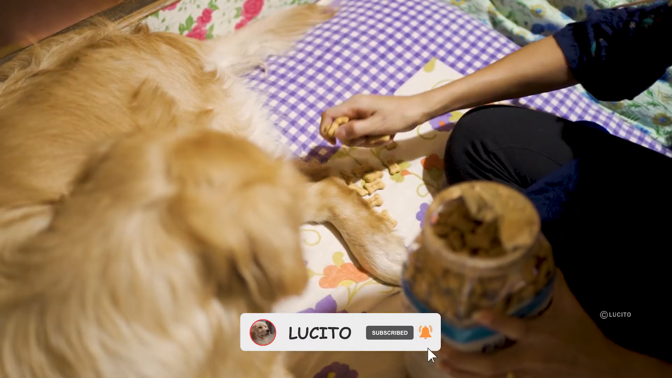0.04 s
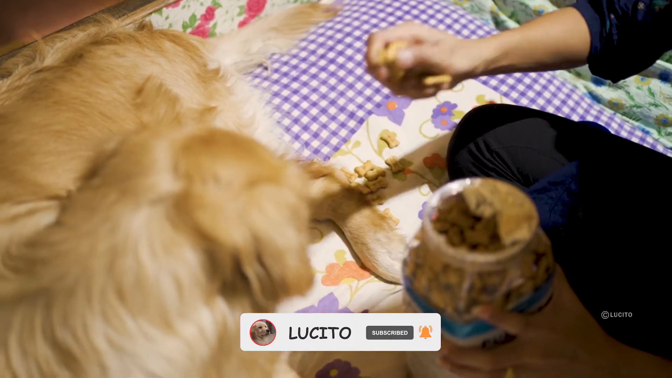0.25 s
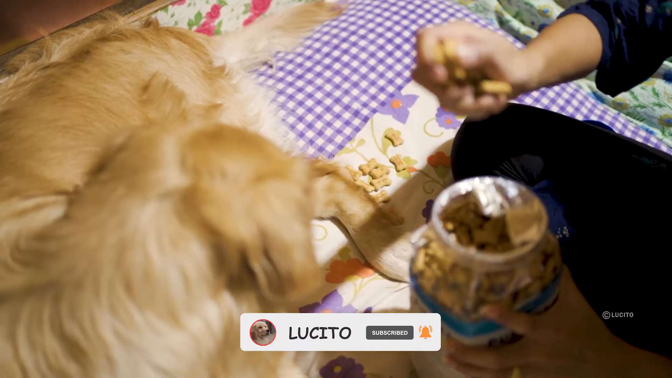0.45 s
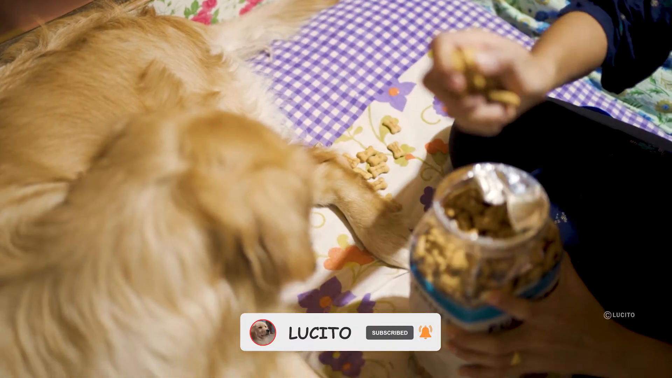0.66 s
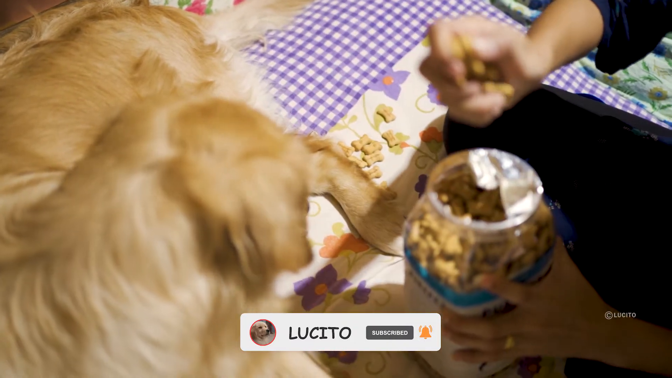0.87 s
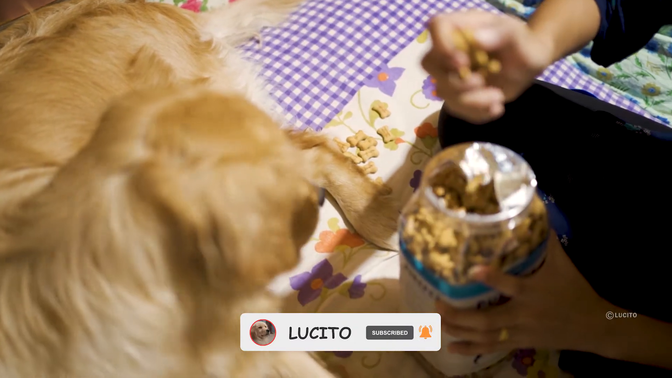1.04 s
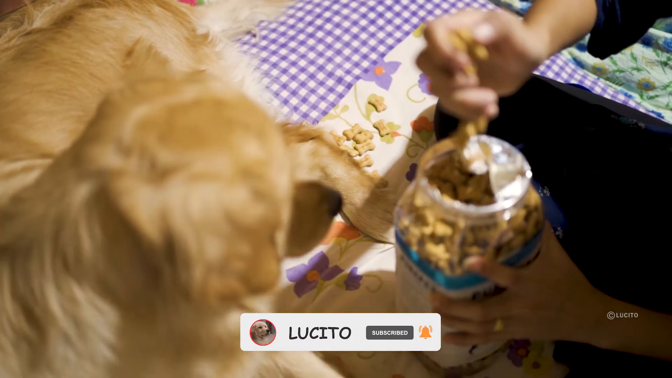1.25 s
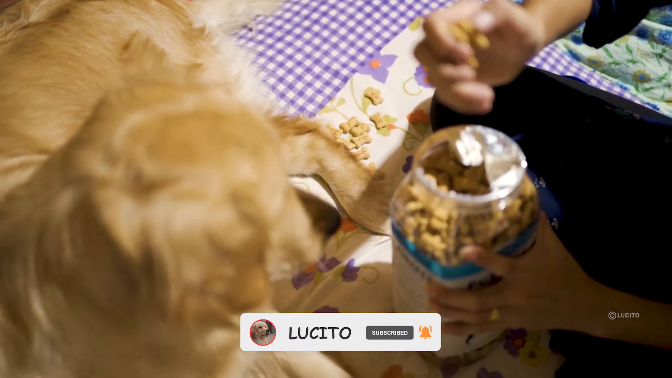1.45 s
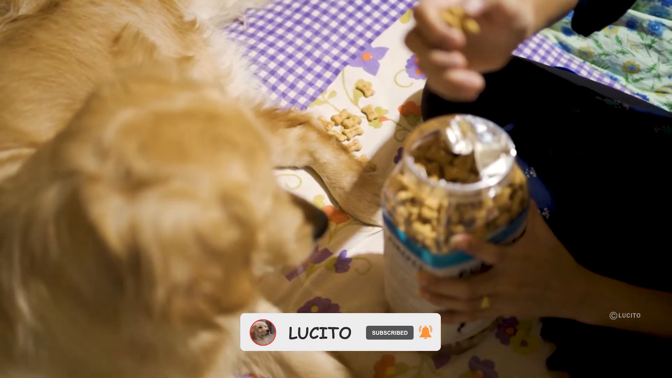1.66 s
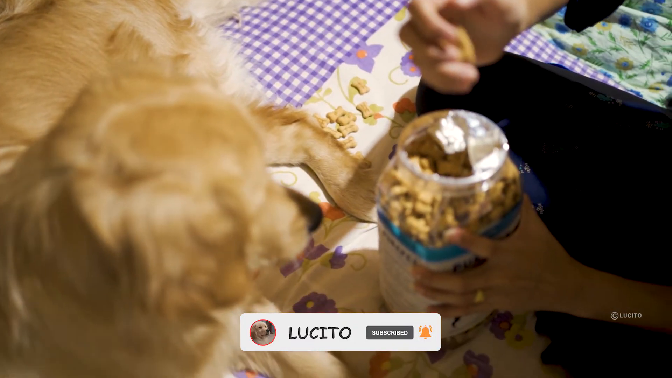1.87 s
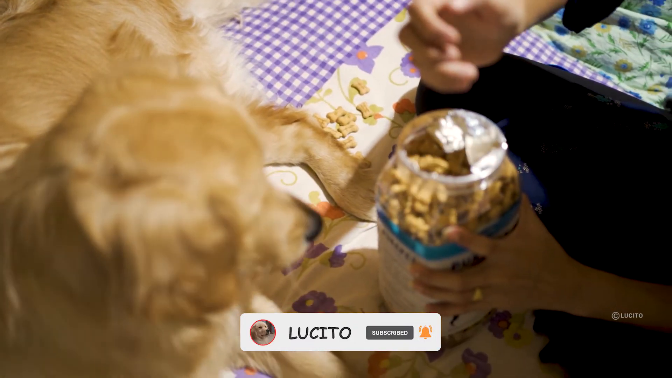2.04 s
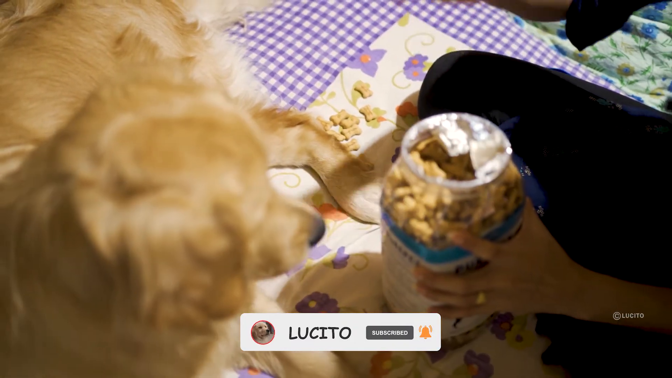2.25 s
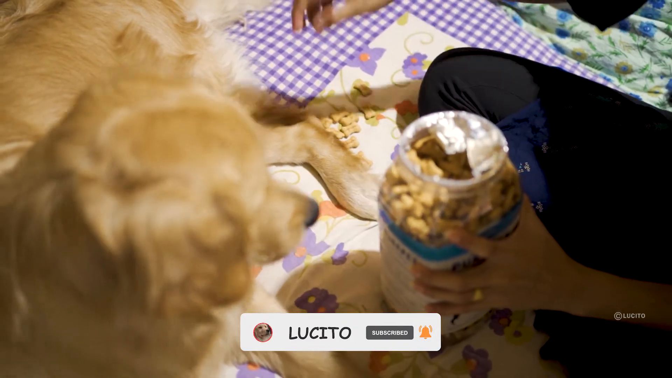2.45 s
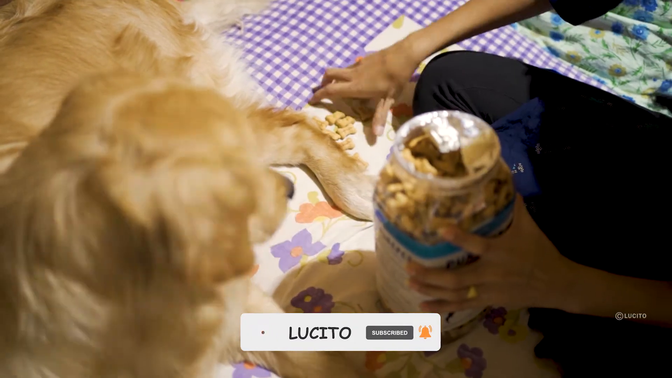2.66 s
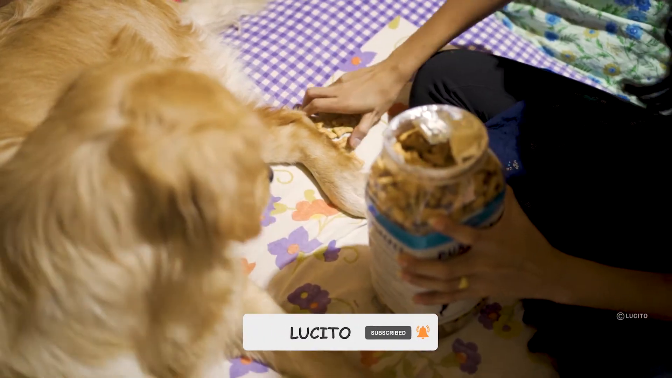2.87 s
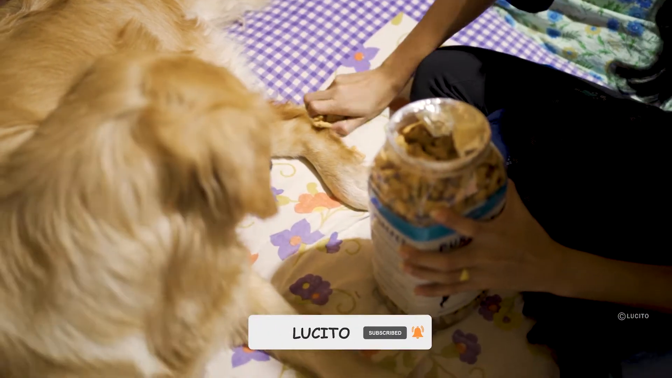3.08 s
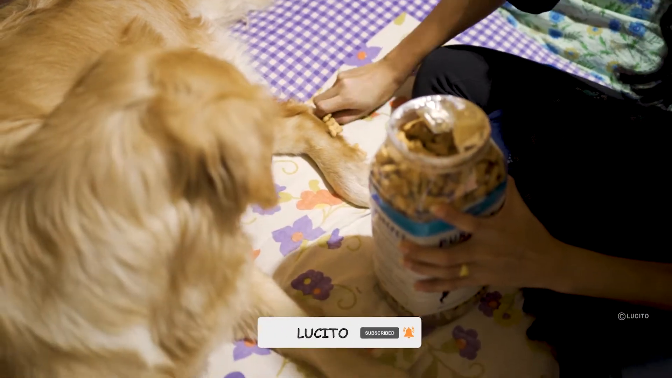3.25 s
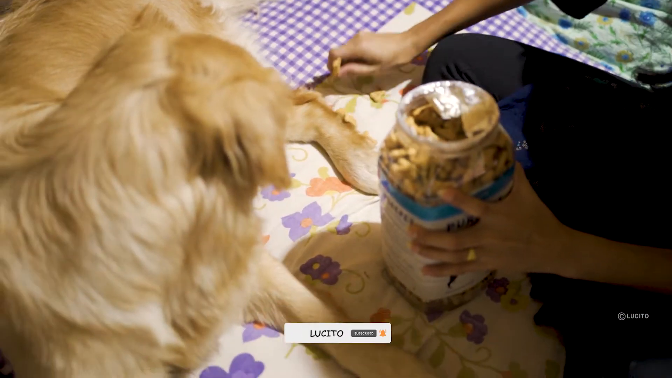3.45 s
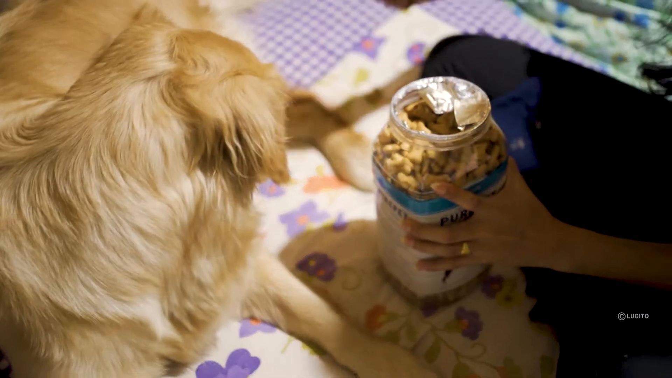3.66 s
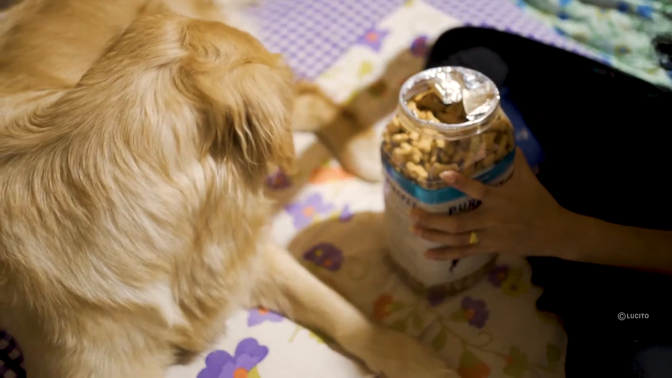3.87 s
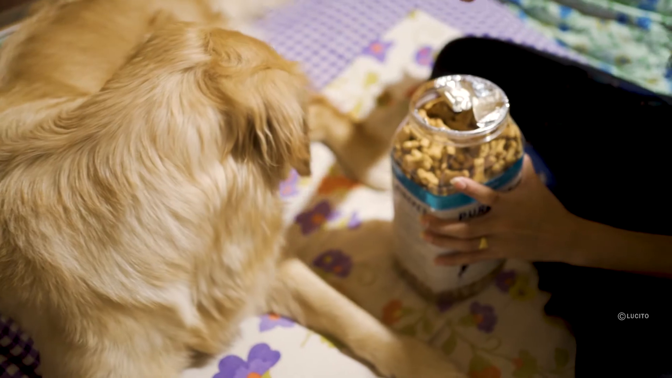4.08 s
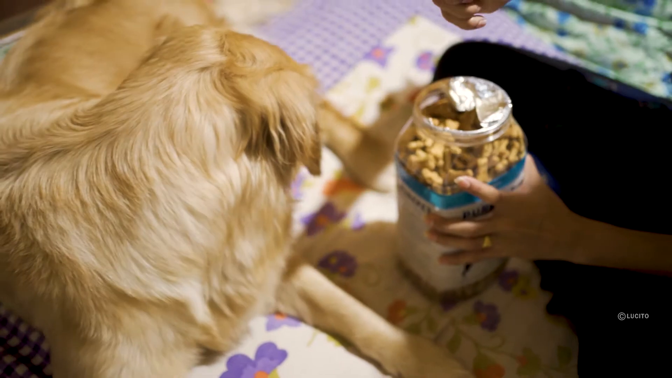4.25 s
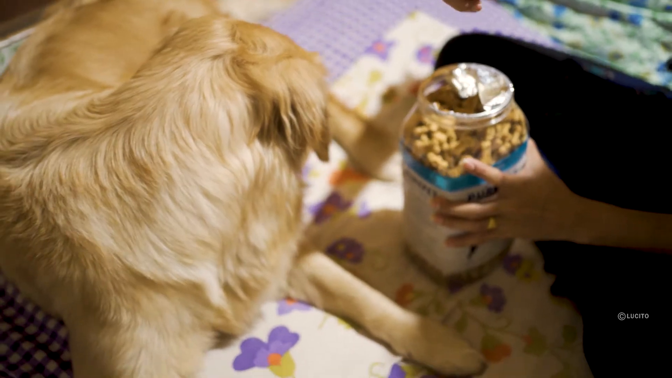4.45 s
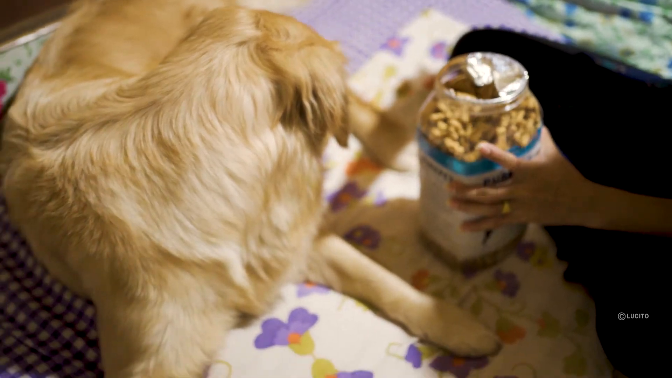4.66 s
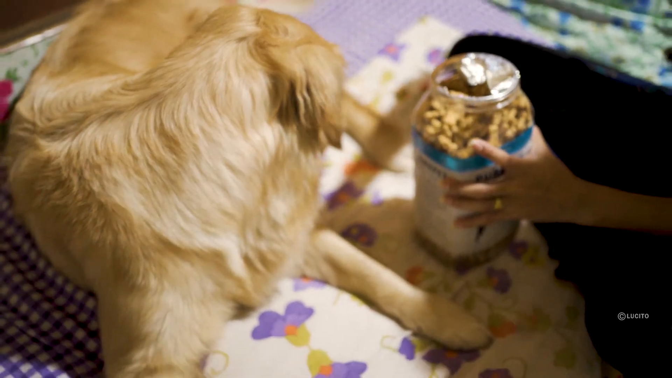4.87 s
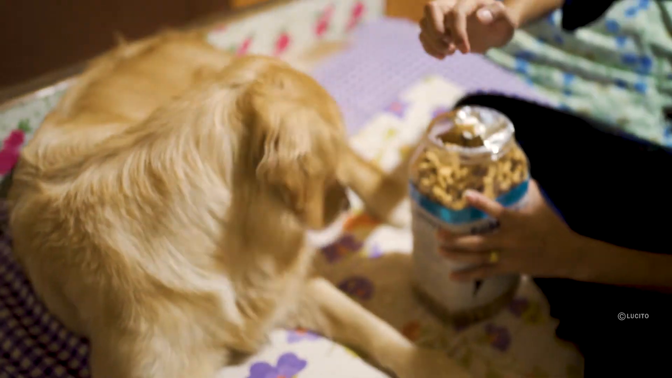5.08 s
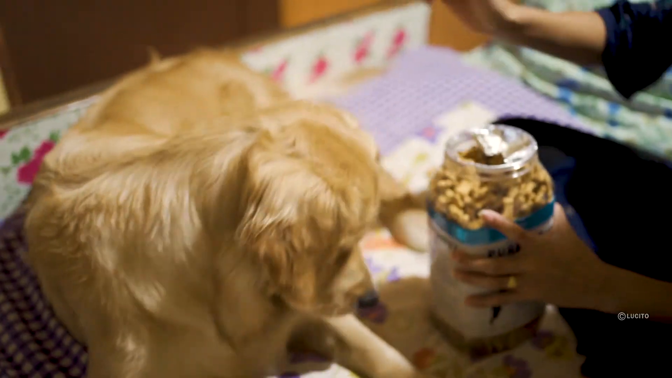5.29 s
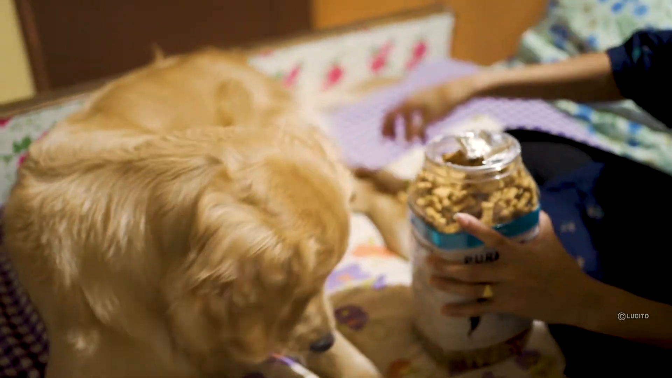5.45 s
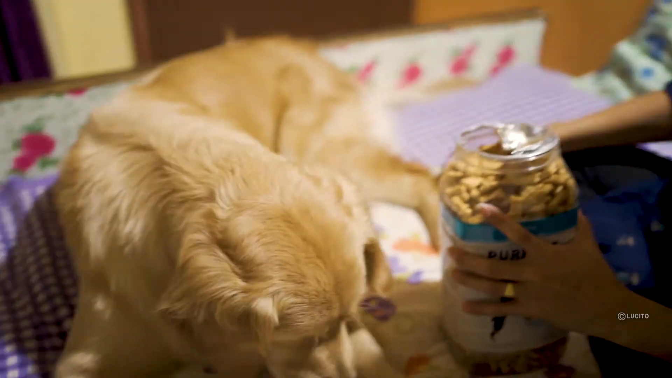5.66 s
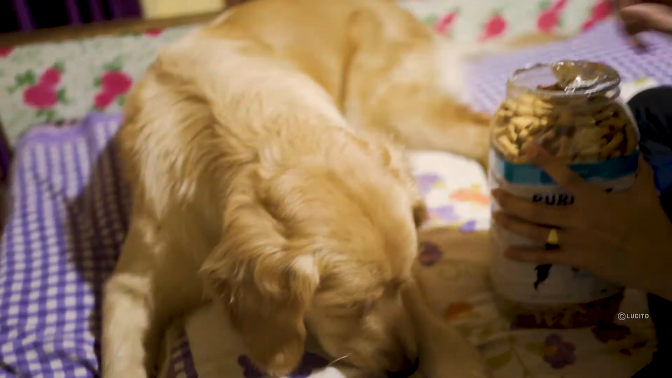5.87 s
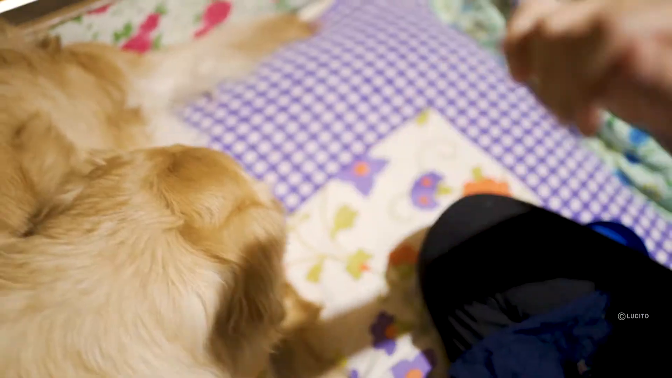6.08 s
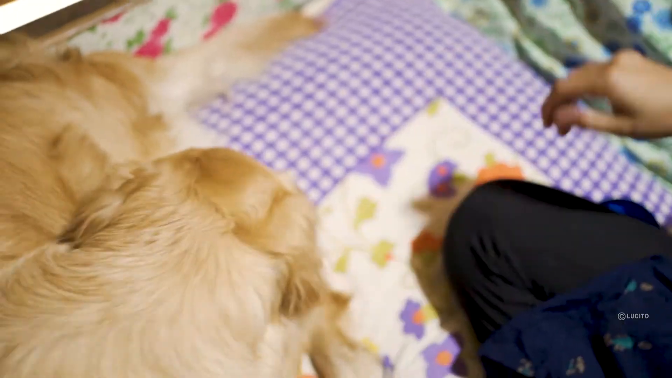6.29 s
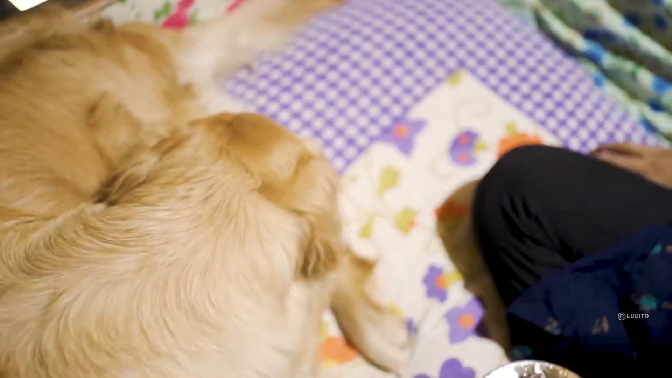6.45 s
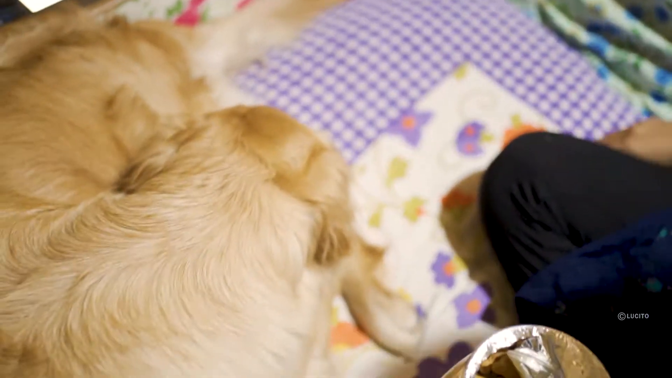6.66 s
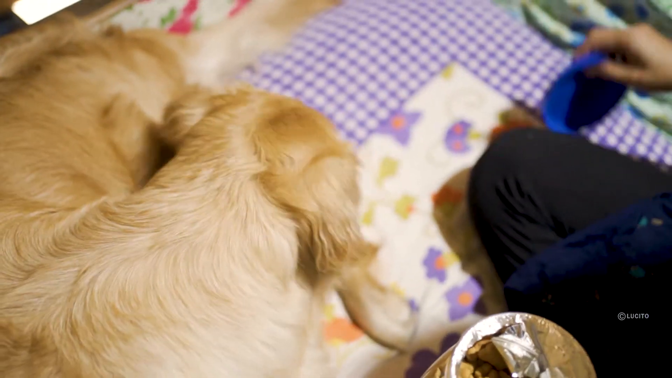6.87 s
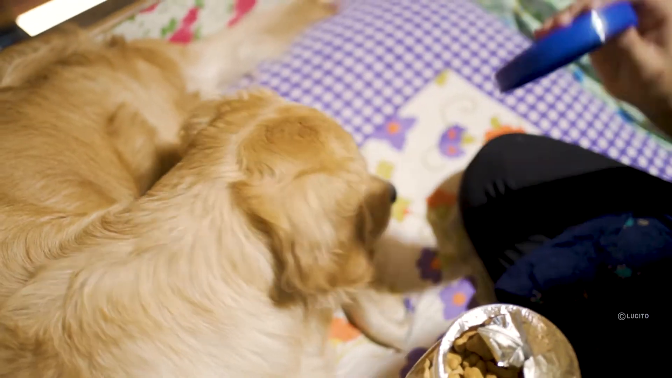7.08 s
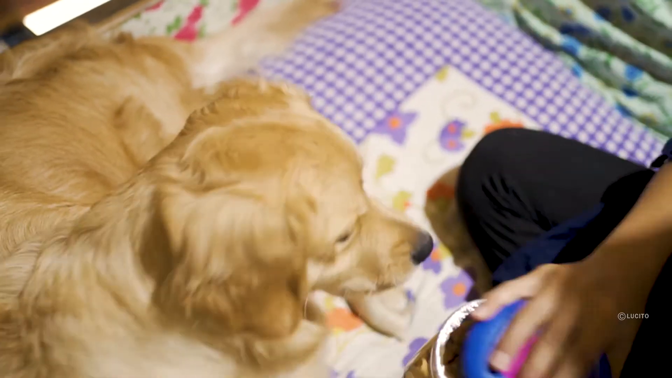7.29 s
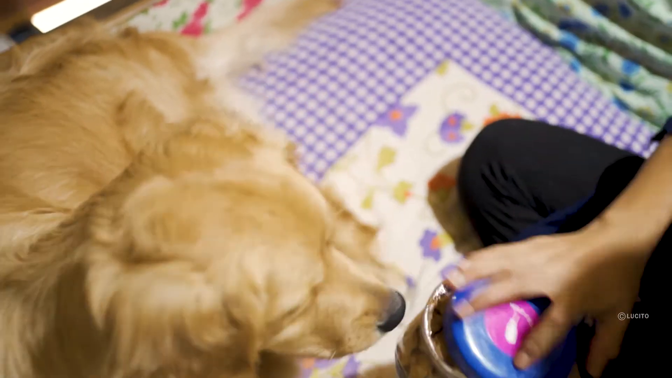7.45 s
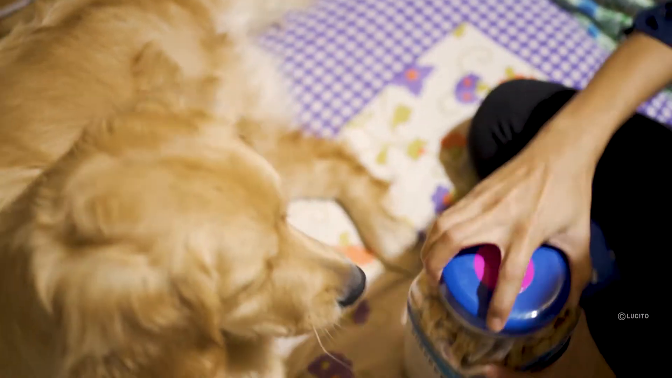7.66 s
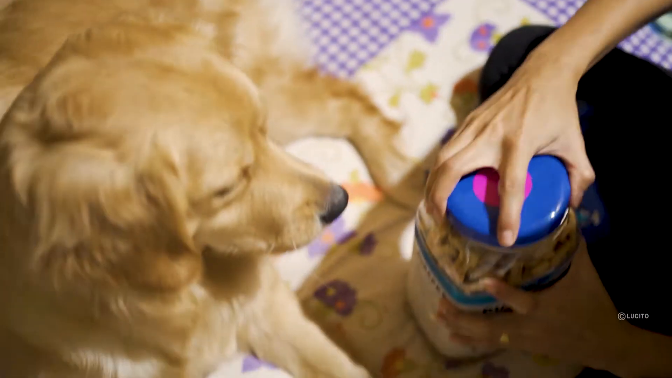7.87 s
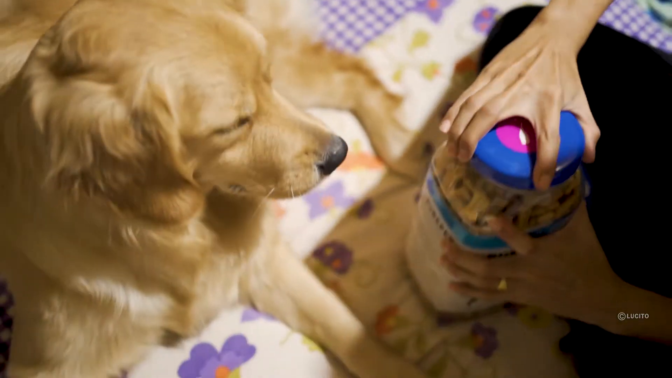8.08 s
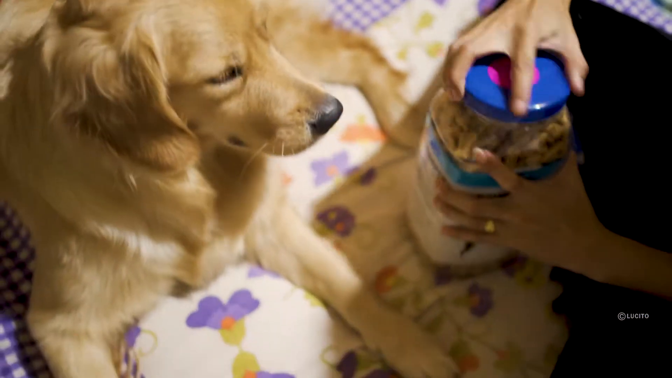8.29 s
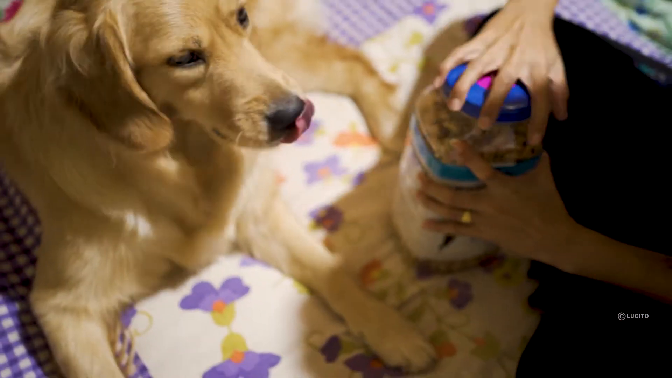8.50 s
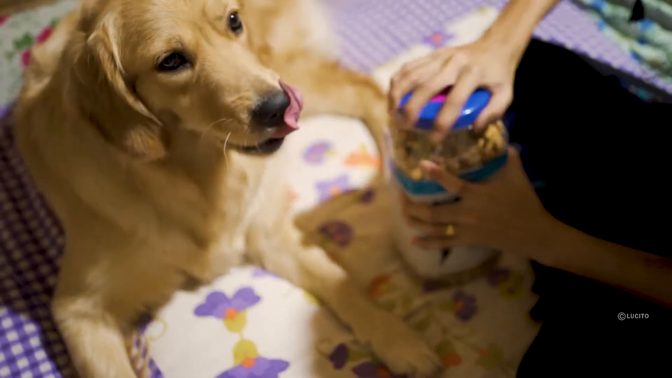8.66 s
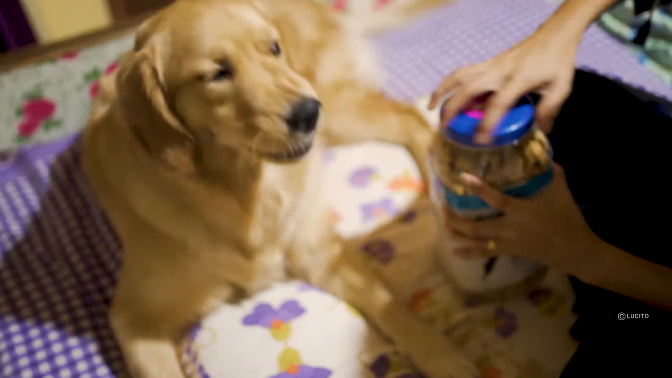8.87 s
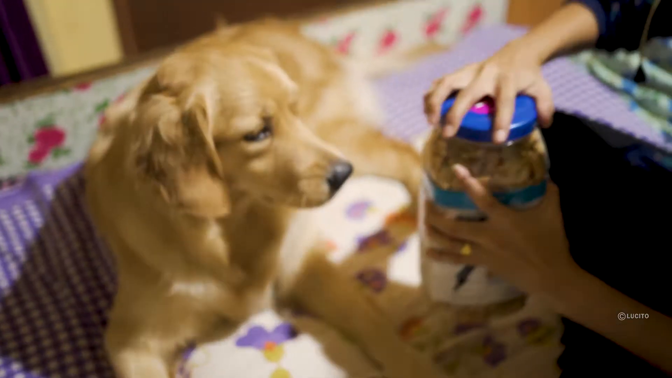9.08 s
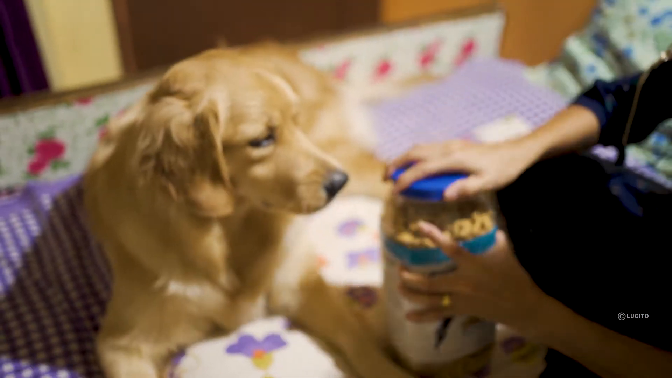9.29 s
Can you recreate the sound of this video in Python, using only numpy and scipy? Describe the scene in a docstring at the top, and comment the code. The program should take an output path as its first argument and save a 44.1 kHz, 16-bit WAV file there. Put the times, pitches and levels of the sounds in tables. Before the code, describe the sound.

A small, quiet, furnished room with soft low room tone, heard closely through a hand-held camera. For the first second there is almost nothing but a faint fabric brush. From 1.1 to 2.3 s hard dry biscuits fall into a big plastic jar in a dense, uneven clatter: bright clicks, hollow knocks, slight foil sizzle and tiny settling ticks. A very faint falling squeak passes at about 2.7 s, then near quiet. Separate sharp drops come at 4.3, 4.6 and 5.1 s, with a dull bump at 4.8. Low handling rumble swells around 4.5 and 5.4 s; a short, stronger cloth swish comes at 5.9. At 7.3 s a plastic lid claps on, crushing foil, then rattles, snaps and scrapes in short twists, with dull thumps from the jar, strongest near 8.0 and 8.3. Weaker rasps follow, and a last clack at 9.2.

```python
"""Dry dog biscuits drop into a big plastic jar: banded noise grains per blow, ringing the jar's modes.
The lid is then clapped on and screwed down, its thread scraping (stick-slip noise) and catching.
Damped sines bump the full jar; a fuzzy sine squeaks faintly as it slides down.
Bedding rustles (cloth noise) in a small, quiet room, and the hand-held camera rumbles as it moves."""
import sys
import numpy as np
from scipy import signal
from scipy.fft import rfft, irfft, next_fast_len
from scipy.io import wavfile

SR = 44100
rng = np.random.default_rng(int(sys.argv[2]) if len(sys.argv) > 2 else 0)


def pcm_store(signal):
    """Save signal as 16-bit PCM."""
    levels = np.round(np.clip(np.atleast_2d(signal), -1, 1) * 32767)
    wavfile.write(sys.argv[1], SR, levels.astype(np.int16).T)


N = 411453

# Room tone spectrum. Each row: frequency in Hz, relative density in dB per Hz.
ROOM_TONE_SPECTRUM = [(29, -47), (50, -9.5), (122, -6), (152, -1.5), (213, -6.5), (313, -6.5), (439, -10.5),
                      (483, -11), (630, -13), (783, -14.5), (884, -16.5), (1660, -22), (1870, -25),
                      (6870, -44.5), (16000, -48.5)]
# Room tone over time. Each row: time in seconds, level in dB before the tone trim.
ROOM_TONE_LEVEL = [(0, -52.5), (5.4, -52), (7.1, -55), (8.2, -52.5), (9.33, -55.5)]
# Camera handling over time. Each row: time in seconds, level in dB.
RUMBLE_LEVEL = [(0, -40), (2.3, -45.5), (3.1, -39), (4.3, -42.5), (4.55, -29.5), (5, -36), (5.4, -27.5),
                (6.4, -33), (7, -39.5), (8.3, -36), (8.55, -32), (9.33, -41.5)]
# Camera handling spectrum. Each row: frequency in Hz, relative density in dB per Hz.
RUMBLE_SPECTRUM = [(3, -32.5), (10, 1), (14, -4.5), (19, -12.5), (30, -19.5), (45, -38), (80, -43),
                   (160, -79.5)]
# Sleeve, fur and bedding brush each other.
# Each row: peak in seconds, rise and fall to 1/e in seconds, level in dB before the cloth trim.
BRUSH_STROKES = [(.53, 0.05, 0.046, -58.5), (3.1, .25, .2, -60.5), (3.63, 0.042, 0.032, -67.5),
                 (4.87, 0.09, 0.052, -56.5), (5.659, 0.048, 0.042, -54.5), (5.85, 0.069, 0.035, -53),
                 (5.932, 0.039, .018, -35.5), (6.48, 0.017, 0.037, -55), (6.65, 0.081, 0.095, -60.5),
                 (6.88, 0.054, 0.058, -57.5)]
# Cloth spectrum. Each row: frequency in Hz, relative density in dB per Hz, before the fibres' slips.
CLOTH_SPECTRUM = [(900, -13.5), (1600, -9), (2700, -7), (3800, -8), (6000, -8), (8800, -8), (11000, -17.5),
                  (13300, -15), (16000, -26)]
# Faint falling squeak. Each row: time in seconds, frequency in Hz, rms level in dB.
SQUEAK_GLIDE = [(2.58, 2850, -91.5), (2.64, 2740, -68.5), (2.72, 2640, -59), (2.84, 2550, -82)]
# The jar is bumped and pressed into the bedding. Each row: start in seconds, initial level in dB, frequency in Hz.
JAR_BUMPS = [(4.839, -27.5, 142), (7.576, -20.5, 110), (7.66, -21.5, 124), (7.83, -20.5, 104),
             (8.11, -27, 109), (8.334, -17, 63), (8.358, -21.5, 86), (8.4, -25, 70), (9.206, -33, 95)]

# Contact registers: thud, knock, clack, tick. Each row: low edge in Hz, high edge in Hz.
BISCUIT_REGISTERS = [(145, 342), (570, 1650), (1550, 5660), (5200, 15160)]
# Same for the broad lid, which sounds lower. Each row: low edge in Hz, high edge in Hz.
LID_BANDS = [(135, 301), (440, 1650), (1450, 5020), (5000, 14900)]
# Room reverberation, one value per register: t60 in seconds.
ROOM_T60_S = [.38, .34, 0.31, 0.23]
# Air and wall modes of the jar. Each row: frequency in Hz, gain at resonance in dB before trim and scatter,
# t60 in seconds.
JAR_MODES = [(171, 12, .3), (234, 12, .33), (556, 4, .1), (624, 6, .16), (841, 2, .12), (1057, 4, .18),
             (1160, 2, .15), (1308, 4, .2), (3160, 2, .12), (3227, 5, .16), (3620, 2, .12), (4506, 4, .16),
             (5194, 3, .12), (5467, 3, .13), (5799, 5, .14), (6490, 5, .16), (6813, 3, .13), (7626, 3, .14),
             (8850, 3, .1), (13140, 5, .1)]
# Colour of all biscuit and lid contacts. Each row: frequency in Hz, gain in dB.
SHELL_COLOUR = [(400, 0.5), (800, 4), (1100, 0.5), (1500, 0.5), (2050, 3), (2700, 0), (3200, 2.5),
                (4600, -2.5), (5800, -1), (9300, 0.5), (10700, -8.5), (12000, -5.5), (13300, -3.5),
                (15500, -7.5)]
# Band in which the torn foil seal sizzles: low edge in Hz, high edge in Hz.
FOIL_BAND_HZ = (12300, 15600)

# Lid strikes the neck or catches in the thread.
# Each row: start in seconds, strength in dB, thud in dB, pitch in Hz; levels before the catch trim and colour.
LID_CATCHES = [(7.267, -21.5, -23.5, 8700), (7.28, -38, -18.5, 195), (7.291, -32, -26.5, 6440),
               (7.41, -24, -35, 2050), (7.562, -31, -41, 2010), (7.581, -41, -33.5, 2490),
               (7.653, -37, -35, 308), (7.679, -30.5, -37, 6200), (7.784, -35.5, -31, 1780),
               (7.804, -26.5, -34, 2310), (7.816, -26.5, -31, 1020), (7.859, -24.5, -26, 3080),
               (7.979, -47, -58, 4340), (8.036, -20.5, -22.5, 1120), (8.114, -26, -26.5, 1230),
               (8.244, -40, -39, 300), (8.282, -39.5, -33, 320), (8.301, -33.5, -51, 4880),
               (8.333, -22.5, -20.5, 470), (8.36, -22, -30, 550), (8.428, -28.5, -41, 790),
               (8.444, -34, -44, 1350), (8.46, -31.5, -56, 1020), (8.886, -42.5, -37.5, 1190),
               (8.947, -38.5, -40.5, 5330), (8.971, -43.5, -39, 202), (9.107, -36.5, -56, 920),
               (9.207, -19.5, -29, 580)]
# Knock, clack and tick of a catch over its strength: in dB.
CATCH_OVER_STRENGTH_DB = (-3.3, -1.6, -8.5)
# Turns of the lid. Each row: peak in seconds, rise to 1/e in seconds, t60 in seconds, strength in dB.
LID_TURNS = [(7.285, 0.0099, 0.29, -25.5), (7.412, 0.022, 0.17, -32.5), (7.55, .041, 0.21, -30),
             (7.676, 0.022, 0.18, -40), (7.816, 0.042, 0.61, -37), (7.855, .035, 0.091, -35.5),
             (8.04, 0.0098, 0.14, -29), (8.13, 0.037, 0.35, -46.5), (8.345, 0.014, 0.54, -28.5),
             (8.41, 0.074, 0.29, -34), (8.679, 0.038, 0.64, -39.5), (8.76, .084, 0.36, -37.5),
             (9.121, 0.09, 1, -46), (9.225, 0.052, 0.69, -31)]
# Lid goes from loose to tight: from and to, in seconds.
TIGHTENING_S = (7.46, 8.3)
# Colour of the lid. Each row: frequency in Hz, gain in dB.
LID_COLOUR = [(300, 1.6), (480, 0), (800, 0), (1230, 2.3), (1700, 1.1), (3300, -2.4), (6000, 0.5),
              (15000, -1.8)]
# Biscuit hits the rim or the pile. Each row: start in seconds, strength in dB,
# hardness in dB (tick over knock), pitch of the struck spot in Hz; levels before colouring.
BISCUIT_DROPS = [(1.078, -26.5, 18.5, 5760), (1.085, -21.5, -6.5, 1080), (1.094, -22, 15.5, 6590),
                 (1.142, -36, -4, 5890), (1.193, -22.5, -1, 4160), (1.283, -29.5, -1, 8990),
                 (1.302, -21.5, 13.5, 5550), (1.319, -18.5, 9, 5820), (1.341, -38, -11, 7600),
                 (1.376, -24.5, 2.5, 2030), (1.408, -31, -1, 840), (1.425, -32.5, 3, 2190),
                 (1.478, -25.5, -8.5, 750), (1.569, -43.5, -25.5, 1720), (1.702, -23, 14.5, 3400),
                 (1.71, -26, 7, 6870), (1.773, -42.5, -9, 6060), (1.827, -29, -5.5, 3440),
                 (1.899, -44.5, -10, 2610), (1.914, -42.5, 9, 6900), (2.001, -18, 1, 1020),
                 (2.008, -21, -2, 8400), (2.026, -24.5, 10, 3270), (2.062, -43, -4, 7200),
                 (2.102, -36, -9, 1010), (2.164, -45.5, -8, 3000), (2.201, -32.5, -14, 1700),
                 (2.232, -38, -22.5, 2000), (2.26, -34, -17.5, 940), (2.793, -56, 8, 6230),
                 (3.219, -53.5, 0, 2080), (4.048, -67, 30, 13000), (4.265, -23, 12, 8500),
                 (4.357, -47, -18.5, 870), (4.416, -53, -12, 855), (4.44, -52, -13, 2500),
                 (4.465, -48, -18, 4160), (4.513, -52, -12, 2000), (4.592, -24, 9.5, 8900),
                 (4.637, -19.5, 0.5, 3620), (4.644, -19, 1, 4450), (4.805, -54, -15, 1660),
                 (5.088, -49.5, 1.5, 4000), (5.111, -21, -2.5, 1034), (5.18, -25.5, 2, 5200),
                 (5.307, -48, 4, 8500), (5.341, -41, -10.5, 1390), (6.884, -45, -4, 1540)]

STIR_DB = -66.5  # constant stir of the bedding, before the cloth trim
BLOW_S = .007  # a blow's levels are its rms over this time
CLACK_DB = 1.24  # clack over a blow's strength
MIDDLING_DB, STRONGER_DOUBLES_DB = -20, 40  # middling blow; extra strength that doubles its chatter
CHATTER_T60_S, HARDER_DOUBLES_DB = 0.031, 18.5  # at middling strength, zero hardness; extra hardness that doubles it
# per dB of strength: stronger blows get relatively more room and less foil
ROOM_DB_PER_DB, FOIL_DB_PER_DB = 0.38, -0.28
FOIL_DB_PER_HARDNESS_DB = .2  # the foil hangs on the rim
CRUSH_DB = -32  # the landing lid crushes the foil
# last hops onto the pile: (shortest, longest) flight, first hop below the blow, hardness
SETTLE_S, SETTLE_LOSS_DB, SETTLE_HARDNESS_DB = (.025, 0.058), 25.5, -0.5
HOP_T60_S, HOP_LOSS_DB = .008, 5  # dry tick; drop in level from hop to hop
# thud, knock, clack and tick over a turn's strength: loose booms and rattles, tight only rubs
LOOSE_DB, TIGHT_DB = (-2.5, -0.6, 3.5, -0.5), (-12, 0, -1.1, -7.5)
LOOSE_HZ, TIGHT_HZ = 1690, 1240  # note of the rubbing thread
TOP_HZ = 15850  # band limit


def amp(db):
    """Decibels to gain."""
    return 10 ** (np.asarray(db) / 20)


def unit(x):
    """x at rms 1."""
    return x / np.sqrt(np.mean(x ** 2) + 1e-20)


def along(points, hz):
    """Interpolate (Hz, value) points on a log axis."""
    f, v = np.transpose(points)
    return np.interp(np.log(hz + 1), np.log(f + 1), v)


def curve(rows):
    """(s, value) rows as one value per sample."""
    return np.interp(np.arange(N) / SR, *np.transpose(rows))


def filtered(x, response):
    """x times a zero-phase response of frequency."""
    m = next_fast_len(N + SR // 2)
    return irfft(rfft(x, m) * response(np.fft.rfftfreq(m, 1 / SR)), m)[:N]


def noise(spectrum):
    """Coloured noise of rms 1."""
    return unit(filtered(rng.standard_normal(N), lambda hz: amp(along(spectrum, hz))))


def coloured(x, spectrum, size=2048):
    """Causal minimum-phase colouring, which keeps attacks sharp."""
    cepstrum = irfft(np.log(amp(along(spectrum, np.fft.rfftfreq(size, 1 / SR)))))
    # fold the cepstrum onto positive time
    cepstrum[1:size // 2] *= 2
    cepstrum[size // 2 + 1:] = 0
    impulse_response = irfft(np.exp(rfft(cepstrum)))
    return signal.oaconvolve(x, impulse_response)[:N]


def same_energy(y, x):
    """y scaled to the energy of x."""
    return y * np.linalg.norm(x) / np.linalg.norm(y)


def add(track, s, x):
    """Mix x into the track at time s."""
    part = track[max(round(s * SR), 0):][:len(x)]
    part += x[:len(part)]


def slips(size, per_second, drag):
    """Stick and slip: brief surges of uneven size, decaying in 1 ms, over a steady drag."""
    kicks = (rng.random(size) < per_second / SR) * rng.exponential(size=size)
    return drag + signal.lfilter([1], [1, -np.exp(-1 / (.001 * SR))], kicks)


def grains(force, registers, levels_db, span_s, spiky_db):
    """Tiny uneven impacts under a force envelope (one, or one per register); levels are rms over span_s."""
    size = np.shape(force)[-1]
    sizes = amp(spiky_db * rng.standard_normal(size))
    impacts = force * sizes * rng.standard_normal((len(registers), size))
    out = np.zeros(size)
    for edges_hz, db, row in zip(registers, levels_db, impacts):
        band = signal.butter(3, np.clip(edges_hz, 20, SR / 2 - 100), 'band', fs=SR, output='sos')
        part = signal.sosfilt(band, row)
        out += amp(db) * part * np.sqrt(span_s * SR / np.sum(part ** 2))
    return out


def room_tone(trim_db=2):
    """Quiet room: steady coloured noise on a slow level curve."""
    return amp(curve(ROOM_TONE_LEVEL) + trim_db) * noise(ROOM_TONE_SPECTRUM)


def camera_rumble():
    """Moving the camera: very low noise on a level curve."""
    return amp(curve(RUMBLE_LEVEL)) * noise(RUMBLE_SPECTRUM)


def brushing():
    """Force of the cloth strokes: each swells and fades over a faint constant stir."""
    t = np.arange(N) / SR
    force = np.full(N, amp(STIR_DB))
    for s, rise_s, fall_s, db in BRUSH_STROKES:
        width_s = np.where(t < s, rise_s, fall_s)
        force += amp(db) * np.exp(-((t - s) / width_s) ** 2)
    return force


def cloth(trim_db=-1.0):
    """Fibres catch on each other: cloth noise cut up by slips, under the brushing force."""
    fibres = slips(N, per_second=80, drag=1.1)
    return amp(trim_db) * brushing() * unit(fibres * noise(CLOTH_SPECTRUM))


def squeak(width_hz=70):
    """A sine slides down, fuzzed by slow noise, as the hand reaches over the bedding."""
    rows = np.array(SQUEAK_GLIDE)
    fuzz = unit(filtered(rng.standard_normal(N), lambda hz: np.exp(-(hz / width_hz) ** 2)))
    level_db = np.interp(np.arange(N) / SR, rows[:, 0], rows[:, 2], left=-np.inf, right=-np.inf)
    phase = 2 * np.pi * np.cumsum(curve(rows[:, :2])) / SR
    return amp(level_db) * fuzz * np.sqrt(2) * np.sin(phase)


def bumps(t60_s=0.046):
    """The full jar gives dull, quickly damped pushes: decaying low sines."""
    out = np.zeros(N)
    t = np.arange(SR // 5) / SR
    for s, db, hz in JAR_BUMPS:
        add(out, s, amp(db - 60 * t / t60_s) * np.sin(2 * np.pi * hz * t))
    return out


def room(registers, levels_db, build_up_s=0.0016):
    """Diffuse answer of the near walls to one blow; the treble dies first."""
    t = np.arange(SR // 2) / SR
    decay = (1 - np.exp(-t / build_up_s)) * amp(-60 * t / np.array(ROOM_T60_S)[:, None])
    return grains(decay, registers, levels_db, BLOW_S, spiky_db=2.0)


def jar():
    """The jar's modes as decaying sines, one row each, scaled to their gain at resonance."""
    t = np.arange(SR // 2) / SR
    rows = []
    for hz, db, t60_s in JAR_MODES:
        per_sample = 2 * np.log(1000) / (t60_s * SR)
        rows.append(amp(db - 60 * t / t60_s) * per_sample * np.sin(2 * np.pi * hz * t))
    return np.array(rows)


def resounding(x, modes, jar_db):
    """x plus the jar's ring: each call feeds the modes in new random proportions."""
    shares = amp(jar_db + 2.5 * rng.standard_normal(len(modes))) * rng.choice([-1, 1], len(modes))
    response = shares @ modes
    response[0] += 1  # direct sound
    return signal.fftconvolve(x, response)


def own_colour(x, count=60):
    """Every piece and struck spot has random resonances of its own; energy is kept."""
    hz = np.linspace(np.sqrt(600), np.sqrt(16000), count) ** 2
    peaks_db = 3.3 * rng.standard_normal(count)
    return same_energy(coloured(x, np.column_stack([np.r_[400, hz], np.r_[0, peaks_db]])), x)


def struck_spot(x, hz, boost_db, sharpness):
    """The place of contact favours one broad resonance; energy is kept."""
    peak = signal.lfilter(*signal.iirpeak(hz, max(sharpness, 2), fs=SR), x)
    return same_energy(x + amp(boost_db) * peak, x)


def contact(registers, levels_db, t60_s, crack, spiky_db, wet_db):
    """One blow: a sharp crack, the rough surfaces chatter briefly, the room answers."""
    t = np.arange(SR // 10) / SR
    force = (1 - np.exp(-t / .0003)) * (amp(-60 * t / t60_s) + crack * np.exp(-t / .001))
    sound = room(registers, levels_db + wet_db)
    add(sound, 0, grains(force, registers, levels_db, BLOW_S, spiky_db))
    return own_colour(sound)


def foil(level_db, rise_s=0.0052, t60_s=0.037):
    """A blow shakes the torn foil on the neck: treble grains swell, then sizzle out."""
    t = np.arange(SR // 5) / SR
    shake = (1 - np.exp(-t / rise_s)) ** 2 * amp(-60 * t / t60_s)
    return grains(shake, [FOIL_BAND_HZ], [level_db], BLOW_S, spiky_db=5)


def lid_catches(modes, trim_db=0.5, jar_db=-9, room_db=-13):
    """The plastic lid snaps over the thread in sharp cracks; the first one crushes the foil."""
    out = np.zeros(N)
    for s, strength_db, thud_db, hz in LID_CATCHES:
        levels_db = np.r_[thud_db, strength_db + np.array(CATCH_OVER_STRENGTH_DB)] + trim_db
        snap = contact(LID_BANDS, levels_db, t60_s=0.051, crack=2.8, spiky_db=4.0, wet_db=room_db)
        add(out, s, resounding(struck_spot(snap, hz, boost_db=6, sharpness=5.4), modes, jar_db))
    add(out, LID_CATCHES[0][0], foil(CRUSH_DB, rise_s=.008, t60_s=0.17))
    return out


def lid_turns(modes, jar_db=-9):
    """Each turn of the wrist scrapes the thread in stick and slip, duller as the lid tightens."""
    out = np.zeros(N)
    t = np.arange(-SR // 5, SR // 3) / SR
    for s, rise_s, t60_s, strength_db in LID_TURNS:
        tightness = np.interp(s, TIGHTENING_S, [0, 1])
        levels_db = strength_db + (1 - tightness) * np.array(LOOSE_DB) + tightness * np.array(TIGHT_DB)
        force = np.where(t < 0, np.exp(-np.abs(t / rise_s) ** 1.65), amp(-60 * np.abs(t) / t60_s))
        # harder turns add more coarse jolts to the even rasp
        grit = min(amp(levels_db[2] + 33), 1.3)
        rasp = slips(len(t), per_second=500, drag=.85)
        friction = rasp + grit * slips(len(t), per_second=140, drag=0)
        span_s = np.sum(force ** 2) / SR
        scrape = grains(force * friction, LID_BANDS, levels_db, span_s, spiky_db=4.5)
        note_hz = LOOSE_HZ + tightness * (TIGHT_HZ - LOOSE_HZ)
        scrape = struck_spot(scrape, note_hz, boost_db=-14, sharpness=5.9)
        add(out, s + t[0], resounding(scrape, modes, jar_db))
    return out


def lid(modes):
    """Catches and turns share the colour of the lid's body."""
    return coloured(lid_catches(modes) + lid_turns(modes), LID_COLOUR)


def blow_levels(strength_db, hardness_db, thud_below_db=11.0, thud_per_hardness=0.21):
    """Thud, knock, clack and tick of one blow: hardness trades thud and knock for tick."""
    thud_db = -thud_below_db - thud_per_hardness * hardness_db
    return strength_db + np.array([thud_db, -hardness_db / 2, CLACK_DB, hardness_db / 2])


def hops(s, strength_db, count=3):
    """A biscuit comes to rest in a few ever weaker hops; returns (s, sound) pairs."""
    t = np.arange(SR // 30) / SR
    decay = amp(-60 * t / HOP_T60_S)
    times_s = s + np.cumsum(rng.uniform(*SETTLE_S, count))
    ticks = []
    for k, at_s in enumerate(times_s):
        levels_db = blow_levels(strength_db - SETTLE_LOSS_DB - k * HOP_LOSS_DB, SETTLE_HARDNESS_DB)
        ticks.append((at_s, grains(decay, BISCUIT_REGISTERS, levels_db, BLOW_S, spiky_db=3.0)))
    return ticks


def biscuits(modes, crumb_db=-20, crumb_t60_s=0.11, jar_db=-4.5, room_db=-4.5, foil_db=-11):
    """Falling biscuits: hard rim hits chatter longer and shake the foil, the pile deadens a blow."""
    out = np.zeros(N)
    t = np.arange(SR // 5) / SR
    crumb_decay = amp(-60 * t / crumb_t60_s)
    for s, strength_db, hardness_db, hz in BISCUIT_DROPS:
        levels_db = blow_levels(strength_db, hardness_db)
        extra_db = strength_db - MIDDLING_DB
        t60_s = CHATTER_T60_S * 2 ** (hardness_db / HARDER_DOUBLES_DB + extra_db / STRONGER_DOUBLES_DB)
        wet_db = room_db + ROOM_DB_PER_DB * extra_db
        hit = contact(BISCUIT_REGISTERS, levels_db, t60_s, crack=0.63, spiky_db=4.0, wet_db=wet_db)
        add(out, s, resounding(struck_spot(hit, hz, boost_db=2.5, sharpness=5.2), modes, jar_db))
        sizzle_db = strength_db + foil_db + FOIL_DB_PER_DB * extra_db + FOIL_DB_PER_HARDNESS_DB * hardness_db
        add(out, s, foil(sizzle_db))
        # the neighbours in the pile shift: sparse, very uneven grains
        add(out, s + 0.0041, grains(crumb_decay, BISCUIT_REGISTERS, levels_db + crumb_db, BLOW_S, spiky_db=19.0))
        for at_s, tick in hops(s, strength_db):
            add(out, at_s, tick)
    return out


def scene():
    """Biscuits and lid ring through the jar, over bumps, squeak and background."""
    modes = jar()
    contacts = coloured(biscuits(modes) + lid(modes), SHELL_COLOUR)
    background = room_tone() + camera_rumble() + cloth()
    return (contacts + bumps() + squeak() + background)[None]


def record(dry):
    """The camera rounds off the highest peaks and cuts steeply above its band limit."""
    ceiling = .8
    rounded = dry[0] / (1 + np.abs(dry[0] / ceiling) ** 4) ** (1 / 4)
    return filtered(rounded, lambda hz: 1 / (1 + (hz / TOP_HZ) ** 200))[None]


dry = scene()
out = record(dry)
pcm_store(out)
```